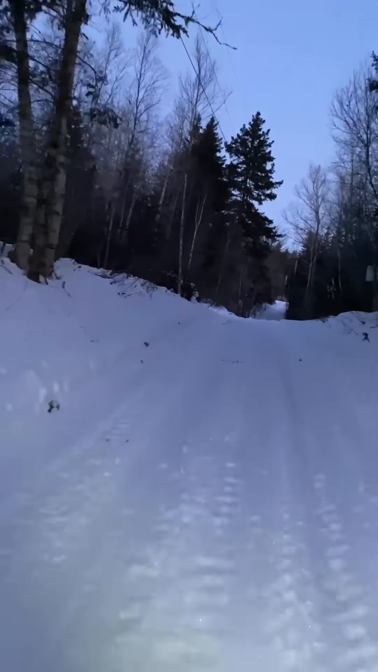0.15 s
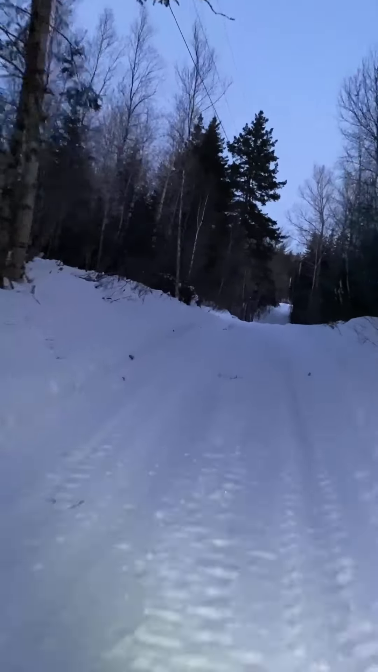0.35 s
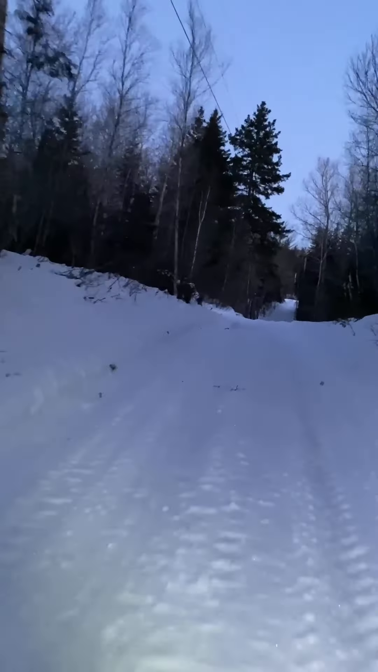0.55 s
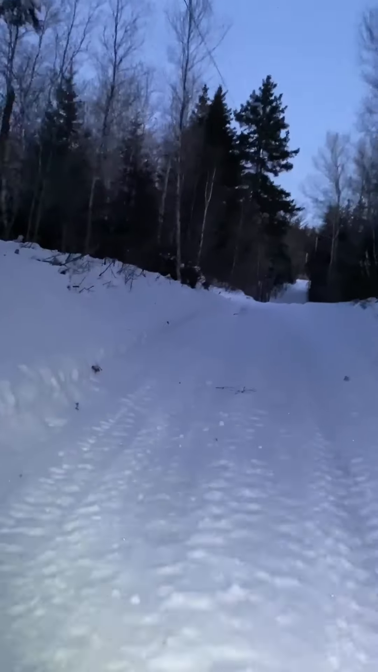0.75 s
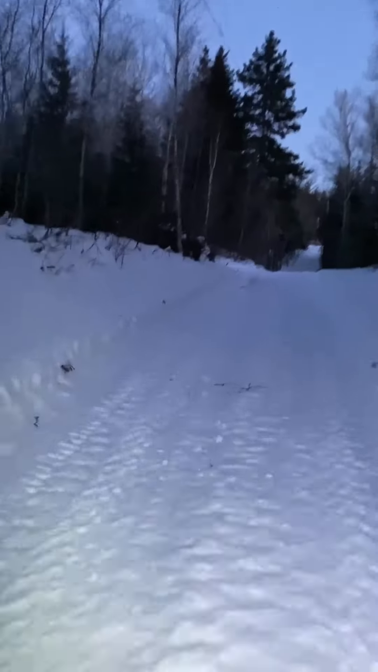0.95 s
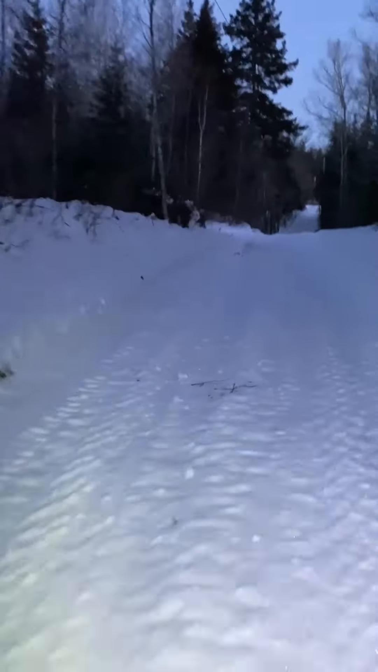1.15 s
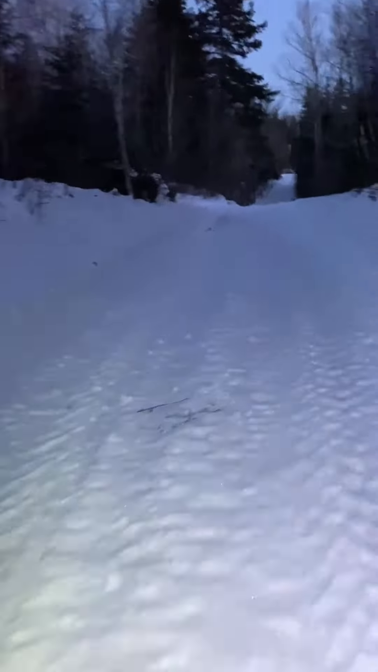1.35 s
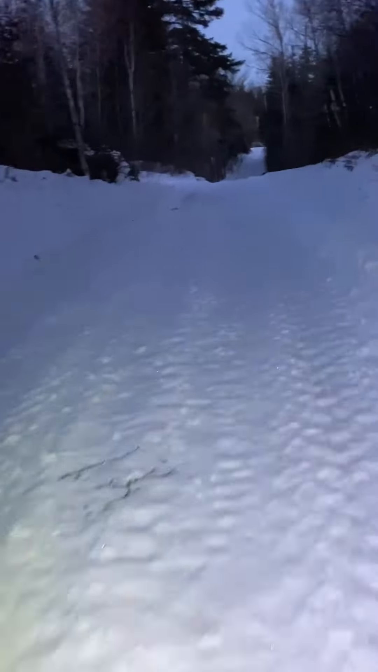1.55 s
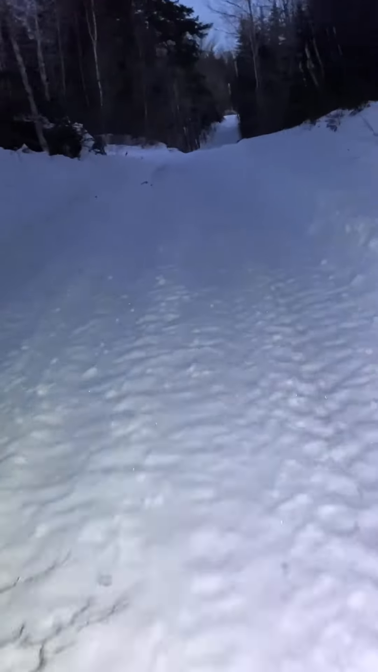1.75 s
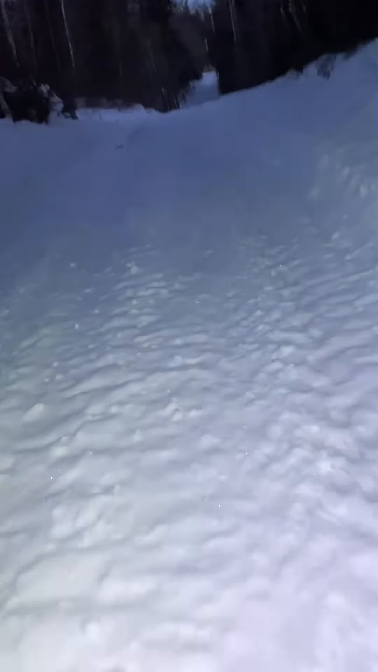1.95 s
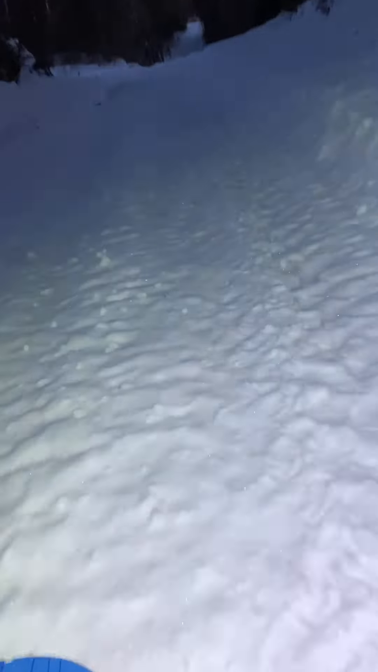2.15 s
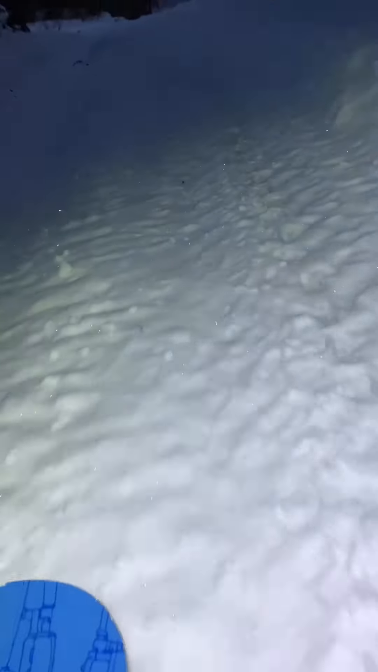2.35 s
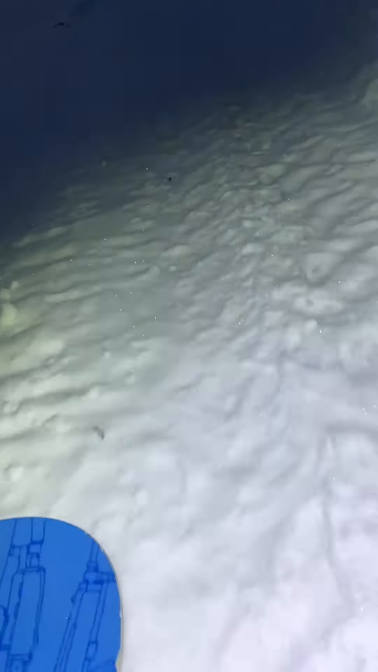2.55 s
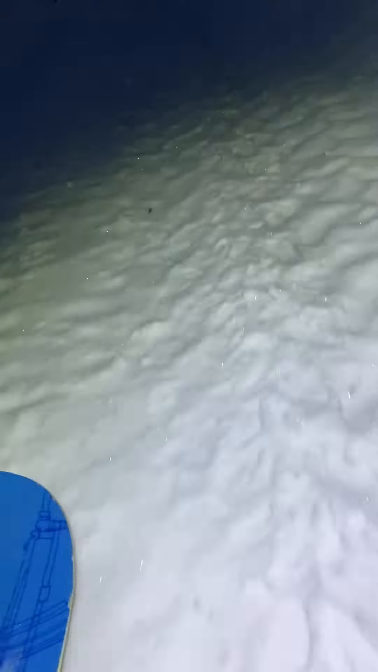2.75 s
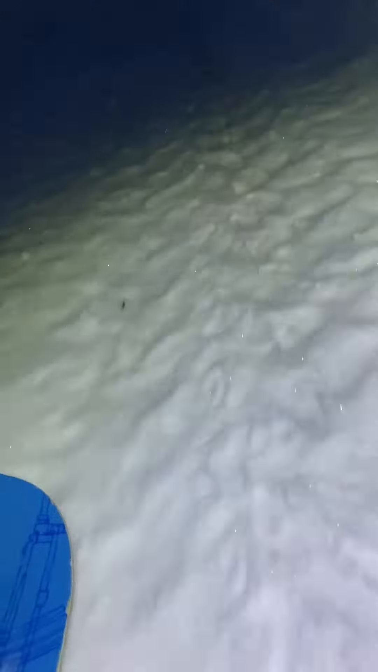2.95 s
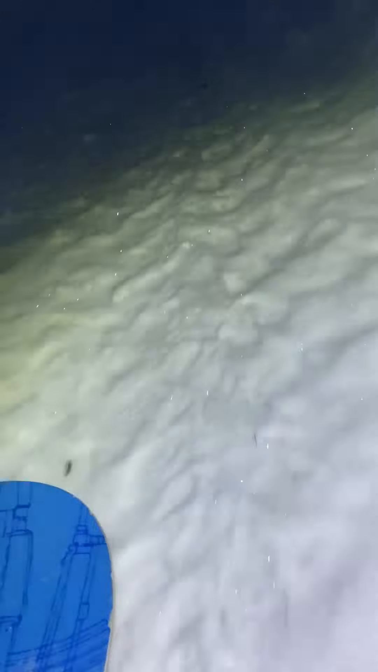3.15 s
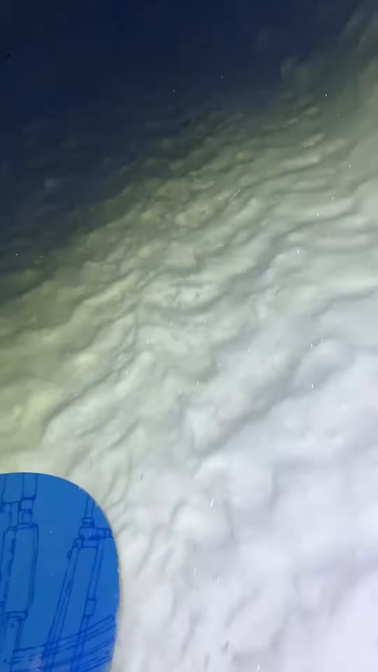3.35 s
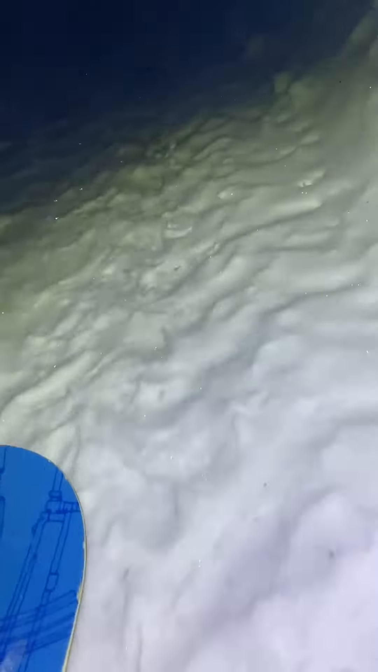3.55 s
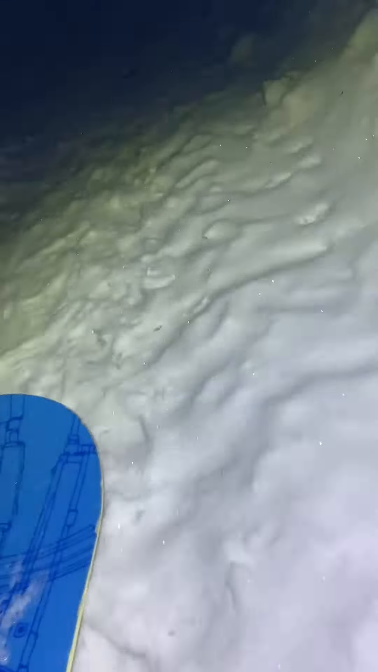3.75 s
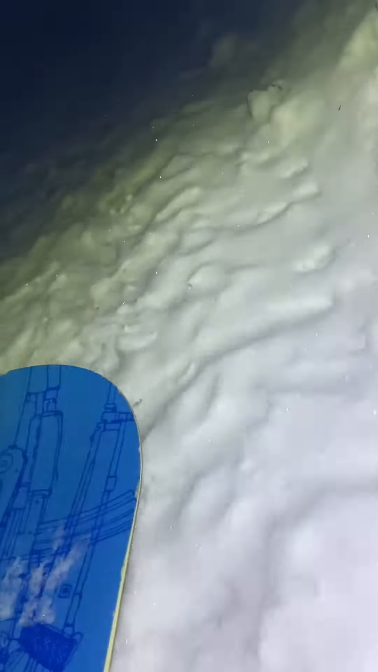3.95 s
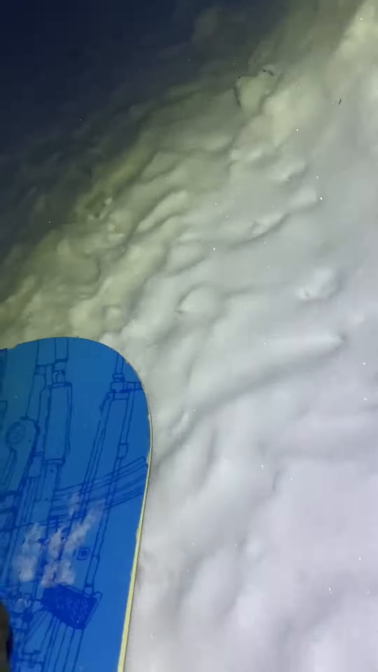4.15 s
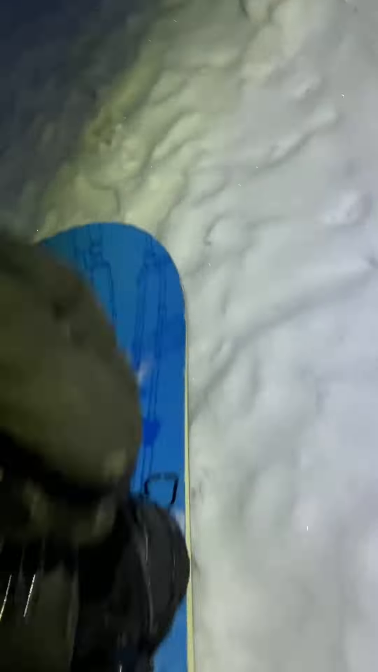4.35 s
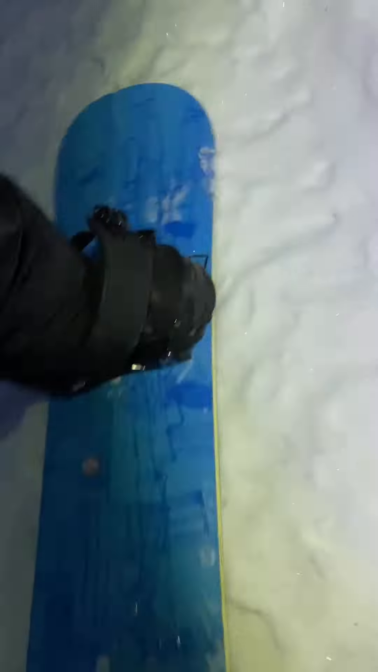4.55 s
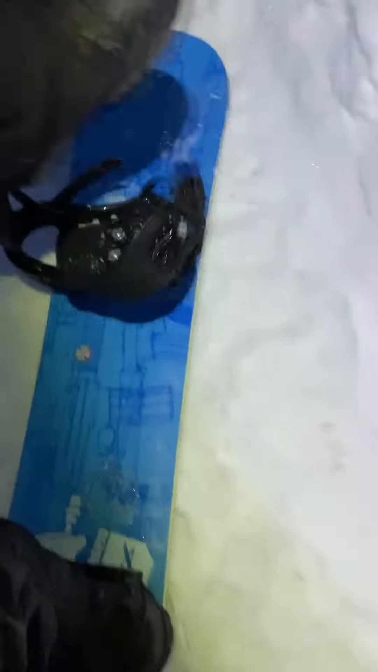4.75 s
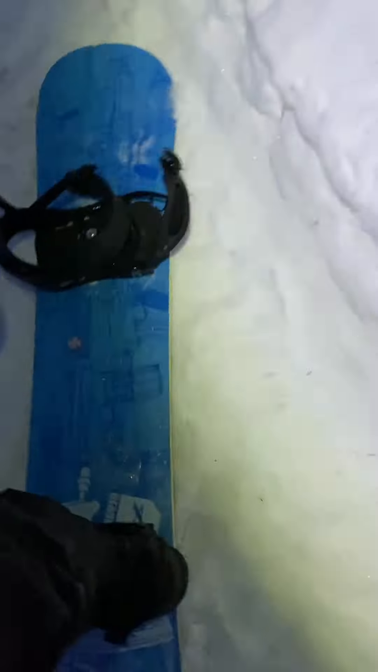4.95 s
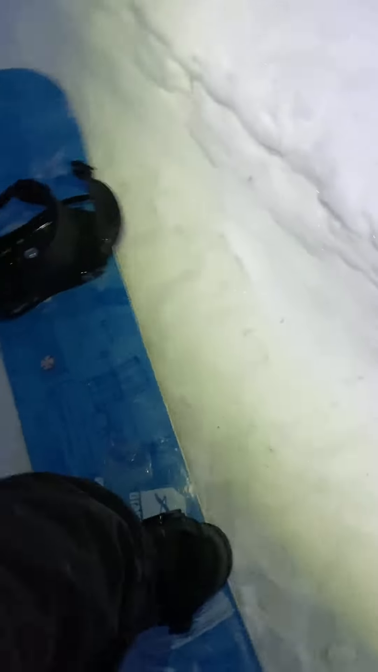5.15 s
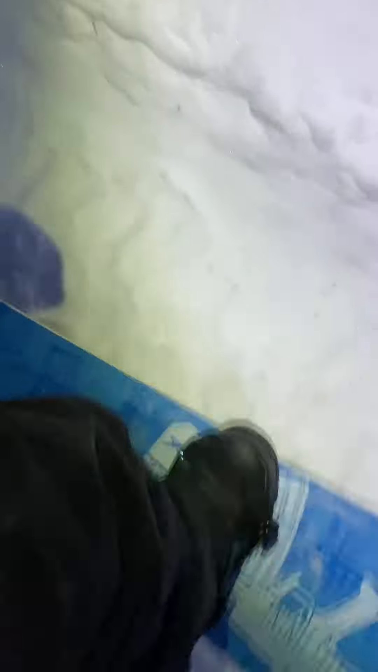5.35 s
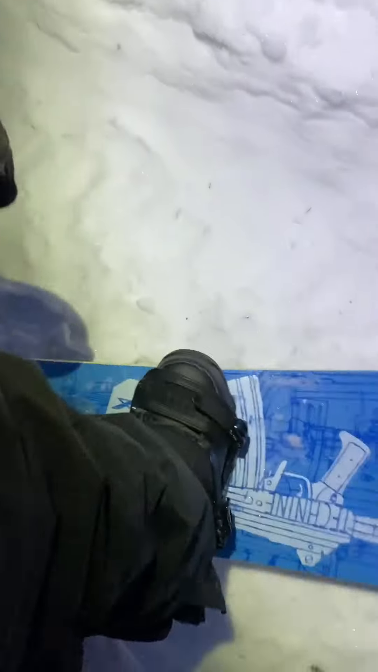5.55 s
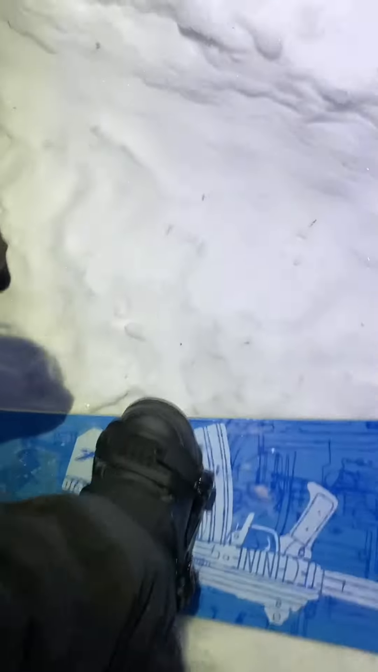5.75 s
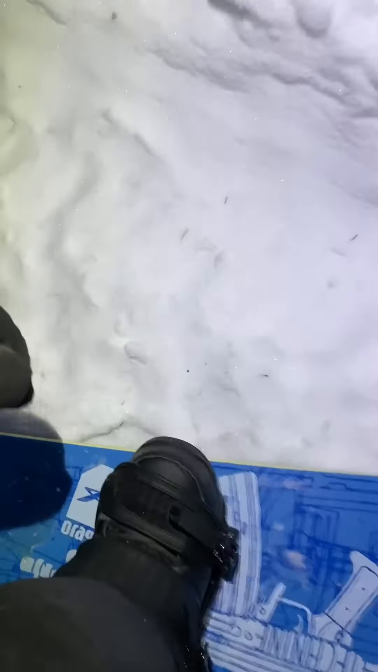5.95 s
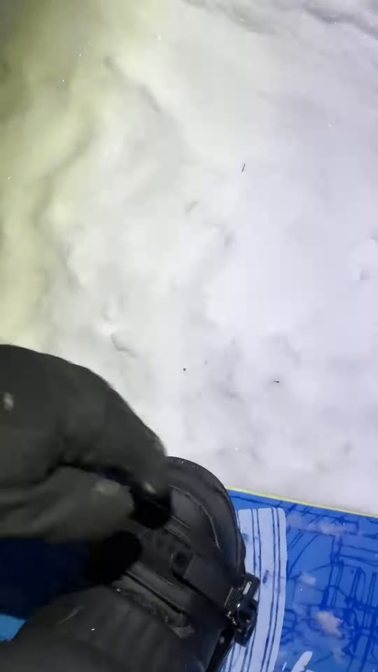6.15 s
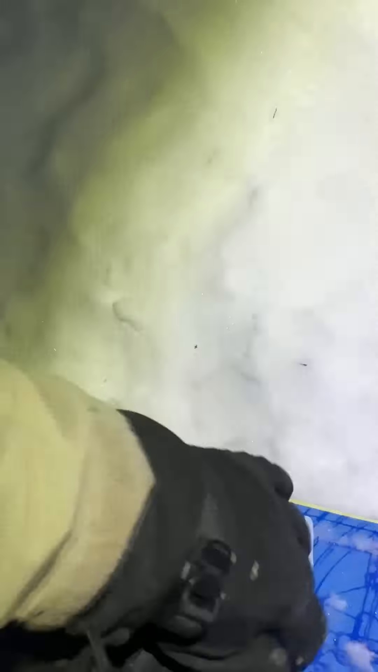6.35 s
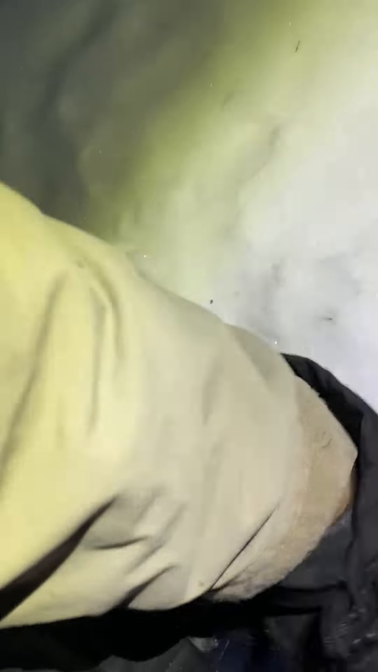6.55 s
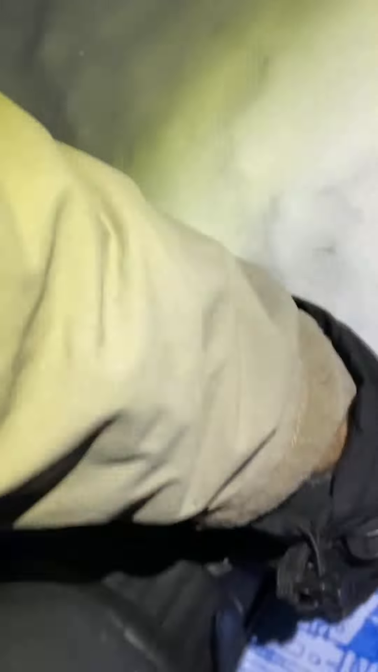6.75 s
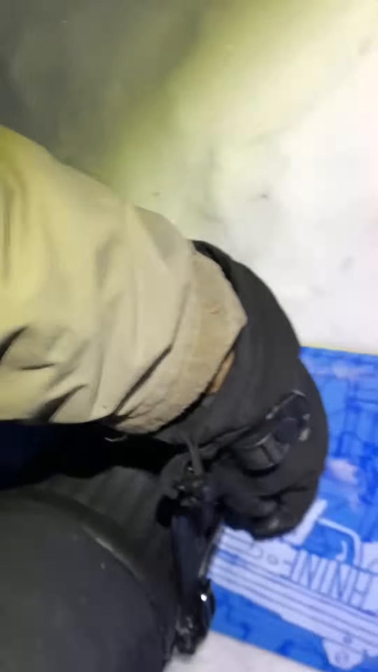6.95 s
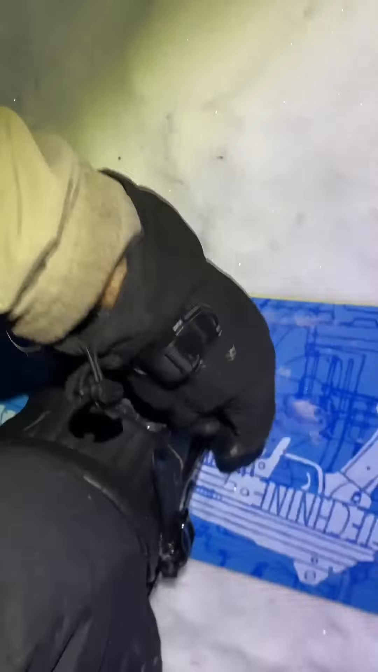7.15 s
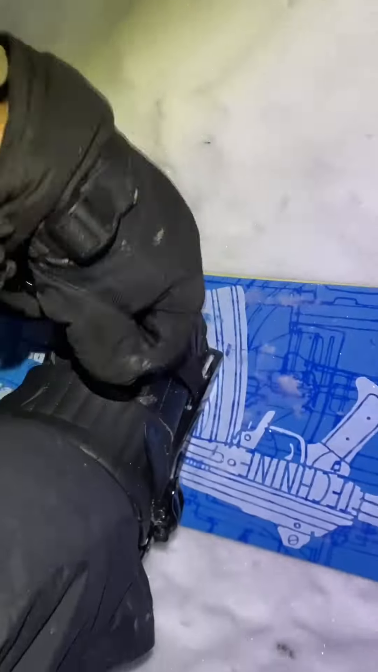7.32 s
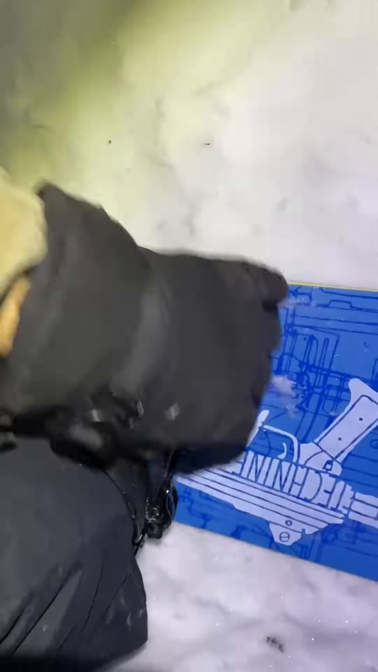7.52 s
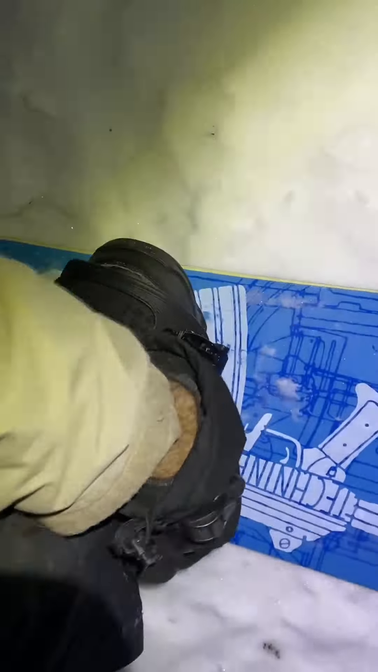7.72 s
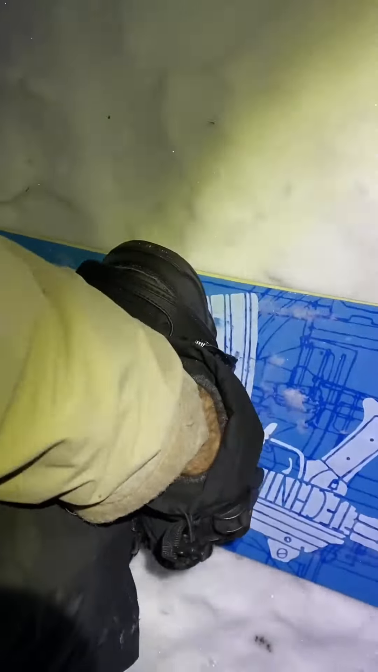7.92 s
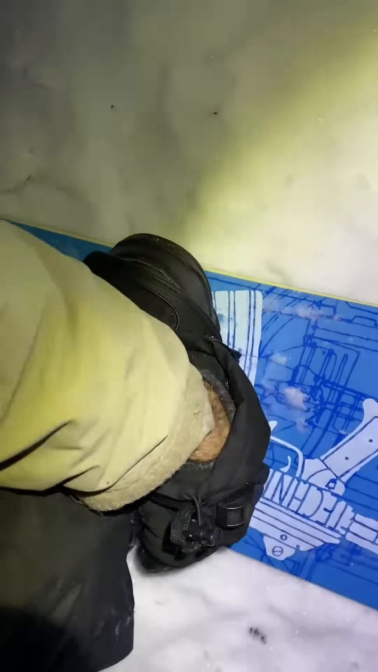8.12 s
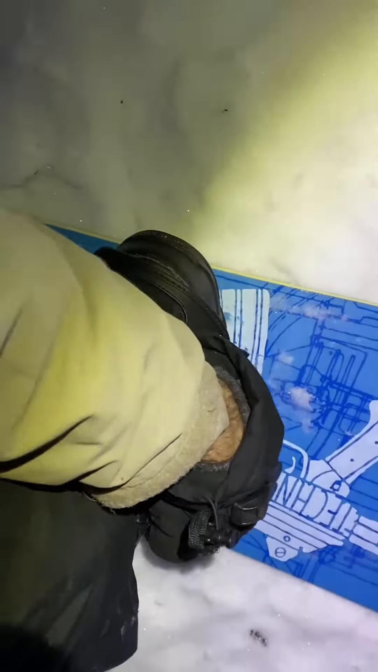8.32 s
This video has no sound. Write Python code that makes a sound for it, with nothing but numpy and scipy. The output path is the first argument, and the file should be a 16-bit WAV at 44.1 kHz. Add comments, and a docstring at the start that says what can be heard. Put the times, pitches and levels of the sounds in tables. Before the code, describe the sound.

Outdoors, dry and close to a handheld stereo phone. From 0 to 1 s a snowboard runs downhill over packed, ribbed snow: a grainy scrape with hollow drumming, soft low wind puffs and a few dull bumps. From 1.1 s icy lumps crack and knock in quick clusters; between 1.9 and 3.5 s braking makes it rougher and brighter, with hissing snow spray strongest around 2.4-2.7 s. Near 3.75-4.25 s a faint hum falls in pitch as the board slows. Short skids and hard knocks follow, notably at 4.65, 5.2 and 5.6 s, ending by about 6.1 s. Then it is quiet: snow creaks, a sleeve rustles, buckles snap at 6.14, 6.55 and 7.0 s, with a fast strap zip at 7.1 s, clicks and a thud around 7.3 s, and a brief glove brush at 7.55 s. Creaks and knocks come at 7.7-7.9 s, then sparse ratchet clicks accelerate into a hard, rapid burst at 8.2 s.

```python
"""On a packed, ribbed snow road, a snowboard runs downhill, heard through the two ports of a phone in the rider's hand.
Filtered noise of tiny fractures makes the base scrape, bumps drum the board's modes and the edge spray snow as it
brakes, skids round and stops; a swept tone is the hum of ribs, and low noise is wind on the ports.
Then slipping grains creak under the boots, a sleeve rustles as coloured noise, fast runs of ticks are a strap and
a glove's fabric, and struck modes with short pings make the buckles and ratchet of a binding."""
import sys
import numpy as np
from scipy import signal
from scipy.fft import rfft, irfft
from scipy.io import wavfile
from scipy.ndimage import uniform_filter1d, map_coordinates

SR = 44100
rng = np.random.default_rng(int(sys.argv[2]) if len(sys.argv) > 2 else 0)


def int16_out(signal):
    """Quantize to a 16-bit WAV file."""
    q = np.round(np.clip(np.atleast_2d(signal).T, -1, 1) * 32767)
    wavfile.write(sys.argv[1], SR, q.astype(np.int16))


N = 373968
TIME = np.arange(N) / SR
STOP_S = 6.1  # the board comes to rest
BEND_S = 0.000922  # lag of bending waves at 1 kHz
FREE_THUD_HZ, PINNED_THUD_HZ = 126, 196  # lowest thud: a board bedded in the snow cannot flex as deeply
GUST_RISE_S, GUST_FADE_S = 0.019, 0.027

# how the board sits, relative to its drumming: ring of the biting edge, deep flex, rumble of the flat base
# time_s, edge_db, flex_db, flat_db
STANCE = [(0, -30, -4, 2), (1.05, -33, -8.5, 2.5), (1.3, -30, -1, -14), (1.9, -6, -2.5, -19),
          (2.7, -9, -4.5, -32), (3.5, 0, -1, -28), (4.0, -3, -11, -33.5), (5.05, -6.5, -1, -29),
          (5.4, -20, -34.5, -26.5), (6.1, -6.5, -28, -29)]
# spectrum of the base scraping on snow: freq_hz, level_db
SCRAPE = [(300, -8), (700, 8.5), (1100, 0), (1450, -1), (1720, 3), (1970, 0.5), (2270, 4), (2800, -1),
          (4100, -4.5), (5100, -3), (6500, -10.5), (9000, -37), (16000, -28.5)]
# spectrum of a bright crack: freq_hz, level_db
CRACK = [(800, -16), (2000, 7), (2600, -12.5), (3400, -5), (5300, 3), (6500, -4.5), (10000, -1),
         (16000, -28)]
# spectrum of rubbing cloth and of the fast ticks: freq_hz, level_db
CLOTH = [(500, -2), (800, 0), (1500, 2), (2400, 0), (2720, -0.5), (3100, -2), (4200, -6), (5300, -3.5),
         (6500, -7.5), (10000, -8), (16000, -14.5)]


def undb(db):
    """Level is logarithmic: decibels to amplitude gain."""
    return 10 ** (np.asarray(db) / 20)


def unit(x):
    """Normalise the mean power: scale to rms 1."""
    return x / np.sqrt(np.mean(x ** 2))


def curves(table):
    """Linear interpolation in time of every column of a table."""
    s, *columns = np.transpose(table)
    return [np.interp(TIME, s, c) for c in columns]


def span(table):
    """Gating: 1 while a table lasts, with short fades outside it."""
    first, last = table[0][0], table[-1][0]
    return np.interp(TIME, [first - .04, first, last, last + .04], [0, 1, 1, 0])


def swell(s, length, rise_s, fade_s, growth_db_per_s=0):
    """Envelope of a push: a linear rise, a hold that may grow or sag, and an exponential decay."""
    age = np.maximum(TIME - s, 0)
    held = undb(growth_db_per_s * np.minimum(age, length))
    decay = np.exp(-np.minimum(np.maximum(age - length, 0) / fade_s, 20))
    return np.minimum(age / rise_s, 1) * held * decay


def walk(rate):
    """Slow modulation: smooth random wandering with a spread near 1."""
    steps = rng.standard_normal(4096)
    return 1.2 * np.interp(TIME * rate, np.arange(len(steps)), steps)


def spectrum_db(points, hz):
    """Interpolation of a spectrum on a logarithmic frequency axis."""
    f, db = np.transpose(points)
    return np.interp(np.log(hz + 1), np.log(f), db)


def colour(x, points, size=4096):
    """Minimum-phase filtering: a causal filter of the given spectrum, built by folding its cepstrum; rms 1."""
    gain = undb(spectrum_db(points, np.fft.rfftfreq(size, 1 / SR)))
    cepstrum = irfft(np.log(gain))
    cepstrum[1:size // 2] *= 2
    cepstrum[size // 2 + 1:] = 0
    response = irfft(np.exp(rfft(cepstrum)))
    return unit(signal.fftconvolve(x, response[None], axes=1)[:, :x.shape[1]])


def band(x, lo_hz, hi_hz, order=3):
    """Band-pass filtering: the part of a sound between two frequencies, with rms 1."""
    return unit(signal.sosfilt(signal.butter(order, [lo_hz, hi_hz], "band", fs=SR, output="sos"), x))


def grains(spread_db, apart, size=N):
    """Fracture noise: dense tiny breaks of unequal size, partly incoherent between the two ports."""
    strength = undb(spread_db * np.minimum(rng.exponential(size=size // 8 + 1), 5))
    noise = rng.standard_normal((3, size)) * np.repeat(strength, 8)[:size]
    return unit(noise[0] + apart * noise[1:])


def crackle(rate, spread_db):
    """Shot noise: lone, sharp fractures of unequal size, each with a fast decay."""
    hits = (rng.random(N) < rate / SR) * undb(spread_db * np.minimum(rng.exponential(size=N), 2.5))
    decaying = signal.lfilter([1], [1, -np.exp(-1 / (0.00059 * SR))], hits)
    return unit(grains(0, 0.38) * decaying)


def jolts(rate, spread_db, fade_s):
    """Stick-slip: crust catches and gives way in random, fading rises of force, with a steady mean power."""
    hits = (rng.random(N) < rate / SR) * undb(spread_db * np.minimum(rng.exponential(size=N), 3))
    force = signal.lfilter([1], [1, -np.exp(-1 / (fade_s * SR))], hits) + 0.48
    return force / np.sqrt(uniform_filter1d(force ** 2, SR // 10))


def patchy(x, depth_db, rate, count=30):
    """Spectral modulation: each patch of snow has its own colour, so neighbouring bands swell and fade apart."""
    hz, s, cells = signal.stft(x, SR, nperseg=512)
    place = count * np.log1p(hz / 500) / np.log1p(hz[-1] / 500)
    chance = rng.standard_normal((1024, count + 2)).T
    grid = np.meshgrid(place, s * rate, indexing="ij")
    wander = map_coordinates(chance, grid, order=1, mode="nearest")
    return unit(signal.istft(cells * undb(depth_db * wander), SR, nperseg=512)[1][:, :N])


def reflect(x, lag_s, share):
    """Comb filtering by a near reflection off the rider's body; its path shifts as the hand moves."""
    late = TIME - lag_s * (1 + 0.272 * walk(3))
    return unit(x + share * np.array([np.interp(late, TIME, port) for port in x]))


def bend(x, lag_s):
    """Dispersion: bending waves bring the highs first and the lows late; the lag is that at 1 kHz."""
    size = x.shape[1]
    lag_phase = 4 * np.pi * lag_s * np.sqrt(np.fft.rfftfreq(size, 1 / SR) * 1000)
    return irfft(rfft(x) * np.exp(-1j * lag_phase), size)


def ring(push, damping):
    """Modal resonance: the board's damped modes answer a push, a little differently at each place."""
    # board with its bindings, before detuning and the damping factor: freq_hz, width_hz, level_db
    modes = [(291, 84, 8), (396.3, 76, 13), (509, 74, 11), (644, 174, 10), (781, 49, 8.5), (1083, 87, 5),
             (1080, 220, -2), (1678, 110, -2.5)]
    size = push.shape[1]
    hz = np.fft.rfftfreq(size, 1 / SR) + 1
    response = 0
    for (f, width, db), (detune, place) in zip(modes, rng.standard_normal((len(modes), 2))):
        f = f * (1 + 0.063 * detune)
        resonance = 1 / (1 + 1j * (hz ** 2 - f ** 2) / (hz * width * damping))
        response = response + undb(db + 0.35 * place) * resonance
    return bend(irfft(rfft(push) * response, size), BEND_S)


def blow(thud_db, crack_db, crunch_s, damping, grit, tail, ping_hz, ping_db, lowest_hz, size=6144):
    """Impact excitation with peak 1: crushed snow rings the board, with a bright crack and short ping on top."""
    t = np.arange(size) / SR
    age = t / max(crunch_s, .0005)
    burst = (1 - np.exp(-2 * age)) * (np.exp(-age) + tail * np.exp(-t / 0.012))
    crunch = unit(grains(0.31, 0.5, size=size) * burst)
    kick = unit(t * np.exp(-t / .0001))
    body = ring(grit * crunch + kick, damping)
    thud = band(body, lowest_hz, 470)
    clack = band(body, 500, 6000)
    crack = colour(grains(2.3, 0.3, size=size) * burst, CRACK)
    # small metal parts ping clearly, large plastic ones give a broad, hollow clack
    width_ratio = np.interp(ping_hz, [1600, 2600], [1.45, 1.06])
    ping = band(crunch, ping_hz / width_ratio, ping_hz * width_ratio, order=2)
    sound = clack + undb(thud_db) * thud + undb(crack_db) * (crack + undb(ping_db) * ping)
    return sound / np.abs(sound.mean(axis=0)).max()


def snap(db, thud_db, crack_db, ping_hz):
    """Short, hard impact of buckle or pawl, carried into the board."""
    sound = blow(thud_db - .3, crack_db - 10.0, crunch_s=0.0018, damping=0.66, grit=1.35, tail=0.015,
                 ping_hz=ping_hz, ping_db=4.5, lowest_hz=PINNED_THUD_HZ)
    return undb(db - 5.0) * sound


def add(out, s, sound):
    """Superposition: mix a sound in at a time."""
    start = int(s * SR)
    part = sound[:, :N - start]
    out[:, start:start + part.shape[1]] += part


def air():
    """Turbulence: eddies buffet the ports as low noise over the faint, steady hush of the forest."""
    # airflow on the ports: time_s, level_db
    wind_db, = curves([(0, -35.5), (1.2, -44.5), (2.6, -51), (4.2, -56), (4.8, -35.5), (5.4, -55.5),
                       (8.48, -65)])
    # single eddies and movements of the hand: start_s, length_s, level_db
    gust_list = [(0.03, 0.3, -37.5), (.33, 0.05, -36), (0.565, 0.051, -35), (0.824, 0.057, -31.5),
                 (1.478, 0.051, -37), (4.95, 0.14, -43), (5.565, 0.027, -30.5)]
    # spectrum of wind on the ports: freq_hz, level_db
    buffet = [(15, -37), (30, -10), (48, -4.5), (62, 2.5), (90, -4.5), (150, 0.5), (300, -13), (1000, -44)]
    # spectrum of the forest hush: freq_hz, level_db
    forest = [(25, -13), (60, 4), (200, -6), (650, -22), (1200, -3.5), (2500, -11), (5000, -25),
              (16000, -14)]
    gusts = sum(undb(db) * swell(s, length, GUST_RISE_S, GUST_FADE_S) for s, length, db in gust_list)
    wind = colour(grains(0, 0.44), buffet) * np.hypot(undb(wind_db), gusts) * undb(1.3 * walk(15))
    return wind + colour(grains(0, 0.5), forest) * undb(-62.5)


def grip():
    """Structure-borne sound: brief, wavering hums through the phone's body as the grip shifts."""
    # soft low hums, pitch before its waver: start_s, length_s, pitch_hz, level_db
    hum_list = [(6.486, .07, 66, -42.5), (6.855, 0.083, 93.7, -50)]
    out = np.zeros(N)
    for s, length, hz, db in hum_list:
        phase = 2 * np.pi * np.cumsum(hz * (1 + .04 * walk(30))) / SR
        out += unit(np.sin(phase)) * undb(db) * swell(s, length, GUST_RISE_S, GUST_FADE_S)
    return out


def rider():
    """Stick-slip friction: packed snow creaks in small slips under the boots while jacket and glove rub."""
    # the rider shifts weight and reaches down: start_s, length_s, rise_s, creak_db, cloth_db
    move_list = [(6.056, 0.43, 0.27, -33, -43.5), (6.354, 0.085, 0.018, -29, -40),
                 (6.769, 0.28, 0.28, -40, -47), (7.088, 0.1, 0.03, -45.5, -43.5),
                 (7.535, 0.18, 0.032, -49, -39.5), (7.699, 0.26, 0.011, -30.5, -42),
                 (8.267, 0.18, .03, -57, -55)]
    # spectrum of creaking snow: freq_hz, level_db
    creak_spectrum = [(59, -47), (100, -21), (118, -26), (144, -22), (215, -9), (313, 5), (543, 4),
                      (791, 2.5), (1020, -8), (2000, -22), (2600, -41), (4400, -120)]
    still_creak_db, still_cloth_db = -59, -60.5  # crouching is never quite still
    power = np.outer(undb([still_creak_db, still_cloth_db]), TIME > STOP_S) ** 2
    for s, length, rise_s, *db in move_list:
        power += np.outer(undb(db), swell(s, length, rise_s, fade_s=0.032)) ** 2
    creak_gain, cloth_gain = np.sqrt(power)
    slips = jolts(rate=140, spread_db=-7.0, fade_s=0.0052)
    creak = patchy(colour(grains(1.4, 0.39) * slips, creak_spectrum), depth_db=6.0, rate=33)
    rub = grains(2.5, 0.13) * slips ** 0.5 + undb(-3.5) * crackle(rate=90, spread_db=3.0)
    cloth = reflect(colour(rub, CLOTH), lag_s=0.001664, share=0.22)
    return creak * creak_gain + cloth * cloth_gain


def tick_runs():
    """Repeated short excitation: slightly uneven runs of decaying ticks, each run swelling and easing."""
    # fast runs of small ticks: a strap through its buckle, then a glove's fabric brushing, thin and high;
    # mean tick rate: start_s, end_s, ticks_hz, level_db, ping_hz
    run_list = [(7.087, 7.2, 102.8, -39.5, 2210), (7.532, 7.606, 125.7, -38.5, 9150)]
    out = np.zeros((2, N))
    for start, end, ticks_hz, db, ping_hz in run_list:
        since_tick = np.cumsum(1 + 0.15 * walk(60)) * ticks_hz / SR % 1  # fraction of a cycle
        ticks = grains(1, 0.26) * np.exp(-since_tick / 0.11)
        stroke = np.sin(np.pi * np.clip((TIME - start) / (end - start), 0, 1))
        ping = band(ticks, ping_hz * .9, ping_hz * 1.1, order=1)
        out += unit(colour(ticks, CLOTH) + ping) * undb(db) * stroke
    return out


def binding():
    """Impact and friction: buckles snap, a pawl drops into tooth after tooth, and the tightening strap rasps."""
    # single snaps of the buckles, levels before the trims in snap(): start_s, peak_db, thud_db, crack_db, ping_hz
    click_list = [(5.1852, -13.5, 6, 1, 5400), (6.137, -11, 1, 7, 5700), (6.5484, -11, -0.5, 6, 1020),
                  (6.664, -33, -12, 0, 1050), (7.0126, -8.5, 1.5, 8.5, 1570), (7.301, -17, 8, 10, 5000),
                  (7.32, -16, -2, 1, 1570), (7.3275, -16.5, 2, 8, 5230), (7.3986, -30.5, -15, 3, 1620),
                  (7.491, -23, -6, 20, 2620)]
    # ratchet teeth, slack, then quick and hard under load; same trims: start_s, peak_db, crack_db
    tooth_list = [(8.006, -26.5, -12), (8.036, -28.5, -14), (8.071, -31, -23), (8.115, -31, -23),
                  (8.159, -30, -3), (8.1832, -15.5, -14), (8.202, -6.5, -26), (8.212, -12, -19),
                  (8.223, -16, -5), (8.233, -13.5, -11), (8.2437, -15, -3), (8.2572, -19, -7),
                  (8.2686, -16, -5), (8.2802, -20, -19)]
    out = np.zeros((2, N))
    for s, db, thud_db, crack_db, ping_hz in click_list:
        add(out, s, snap(db, thud_db, crack_db, ping_hz))
    for s, db, crack_db in tooth_list:
        add(out, s, snap(db, thud_db=-2, crack_db=crack_db, ping_hz=1130))
    # the strap rasps and creaks as the ratchet pulls it tight
    rub = grains(2.8, .35)
    rasp = undb(-41) * colour(rub, SCRAPE)
    creak = undb(-30) * band(rub, 370, 1430, order=2)
    crank = swell(8.203, length=0.068, rise_s=0.0037, fade_s=0.0078, growth_db_per_s=-87)
    return out + (rasp + creak) * crank


def lumps(size=4096):
    """Brittle fracture: icy crust breaks and crumbles, and the loaded board answers with a short, dead knock."""
    # icy lumps under the base and steel edge: start_s, peak_db, crumble_s, crack_db
    lump_list = [(.236, -18.5, .003, 6), (.423, -14.5, 0.0057, 0), (.59, -15, .014, -3),
                 (1.137, -14, 0.0092, 18), (1.177, -13, 0.01, 0), (1.226, -8.5, .011, 6),
                 (1.252, -10.5, 0.0063, -5), (1.307, -12, .003, 6), (1.34, -7, 0.0033, 3),
                 (1.359, -16, 0.0052, 10), (1.398, -19, 0.0065, 8), (1.753, -8.5, 0.0056, 1),
                 (1.8988, -10, 0.0042, 9), (1.955, -8.5, 0.023, 5), (2.082, -13, .005, 1),
                 (2.1312, -6.5, .002, -11), (2.147, -9.5, 0.013, -3), (2.165, -6.5, 0.0062, 3),
                 (2.1812, -10.5, 0.0027, -10), (2.403, -10, 0.0043, 7), (2.568, -6, .004, -4),
                 (2.599, -11, .008, 0), (2.634, -6.5, .003, -7), (2.662, -7, 0.0062, -1),
                 (2.748, -11, 0.0044, -8), (2.87, -9.5, 0.0079, 4), (2.958, -15, 0.004, 17),
                 (3.123, -10.5, 0.0054, -5), (3.35, -5, 0.0036, -10), (3.3826, -6.5, .004, -8),
                 (4.129, -13.5, .003, -4), (4.2255, -7, .003, 22), (4.228, -7, 0.0036, -5),
                 (4.245, -7.5, 0.0029, -9), (5.258, -13.5, 0.0053, -1), (5.345, -12, 0.0086, 7),
                 (5.374, -19, 0.0016, 9)]
    out, t = np.zeros((2, N)), np.arange(size) / SR
    edge_db = curves(STANCE)[0]
    for s, db, crumble_s, crack_db in lump_list:
        ring_hz = 944 + 8.5 * edge_db[int(s * SR)]  # the knock rises as the edge bites
        crunch = grains(2.14, 0.32, size=size) * (1 - np.exp(-t / 0.00042)) * np.exp(-t / crumble_s)
        knock = band(crunch, ring_hz * 0.577, ring_hz * 1.26) + undb(-2.5) * band(crunch, 191, 600, order=2)
        crack = colour(crunch, SCRAPE) + undb(-13.0) * colour(crunch, CRACK)
        sound = bend(knock + undb(crack_db) * crack, BEND_S)
        add(out, s, undb(db) * sound / np.abs(sound.mean(axis=0)).max())
    return out


def knocks():
    """Impact on a damped plate: heavy blows crush snow under the board and shake the bindings."""
    # blows from bumps, boots and bindings, levels before the trims below:
    # start_s, peak_db, thud_db, crack_db, crunch_s
    knock_list = [(0.313, -11, 13, -17, 0.0016), (.722, -12, 10, -23, 0.0011),
                  (0.7505, -8, 3.5, -17, 0.00089), (0.8469, -10, 7, -8, .005),
                  (0.9052, -4.5, 3.5, -17, 0.003), (1.6204, -10, 5, -1.5, 0.0028),
                  (1.746, -9.5, -11, -3, 0.0052), (1.993, -9, -1, -20, 0.0093),
                  (2.299, -10.5, 4, -10, 0.0067), (2.684, -6, 1, -2, 0.0047), (2.9216, -4, 2, 0, 0.0052),
                  (3.42, -7.5, 1.5, -7, 0.0065), (3.447, -15.5, -5, -9, 0.01),
                  (4.3883, -7.5, 3, -22, 0.0037), (4.647, -1, -7, -2.5, 0.0041),
                  (4.651, -4.5, 2, -19, 0.0049), (4.7135, -12, 10, -3, 0.002),
                  (4.7902, -14, 1.5, -21, 0.0066), (5.0437, -14, 6, -28, 0.0024),
                  (5.2165, -5.5, 1, -6.5, 0.0041), (5.3253, -7, -14, -3, 0.0024),
                  (5.579, -4.5, 8, -10, 0.0092), (5.584, -2, -2, -18, 0.0036),
                  (5.641, -2, -0.5, -13, 0.0024), (5.7127, -10, -7.5, -8.5, 0.0025),
                  (5.754, -18.5, -7, -8, 0.0015), (5.807, -21, 0, -7, 0.0024),
                  (5.8563, -12.5, -6, -6, 0.0037), (5.878, -6.5, -8, -12, 0.002),
                  (5.918, -10, -3, -23, 0.00094), (6.476, -12.5, 1.5, -7, 0.0047),
                  (7.2678, -6.5, 6, -11, 0.0035), (7.7037, -11, 3.5, -18, 0.0039),
                  (7.7228, -14, 4, -27, 0.0038), (7.7722, -13.5, -0.5, -32, 0.0022),
                  (7.808, -23.5, -3, -24, 0.0036), (7.829, -23, -8, -18, .003),
                  (7.9397, -10.5, 2.5, -12, 0.004)]
    out = np.zeros((2, N))
    for s, db, thud_db, crack_db, crunch_s in knock_list:
        lowest_hz = FREE_THUD_HZ if s < STOP_S else PINNED_THUD_HZ
        sound = blow(thud_db - .3, crack_db - 4.0, crunch_s, damping=0.76, grit=2.92, tail=0.089,
                     ping_hz=rng.uniform(2200, 5600), ping_db=-2.5, lowest_hz=lowest_hz)
        add(out, s, undb(db + 0.5) * sound)
    return out


def ribs():
    """Periodic excitation: evenly spaced ribs make the slowing board hum at their passing rate."""
    # ribs passing under the board, before the small wander of pitch and level: time_s, ribs_hz, level_db
    rib_table = [(3.74, 165, -54), (3.89, 131, -41), (3.95, 123, -38), (4.08, 99, -42), (4.28, 79, -55)]
    hz, db = curves(rib_table)
    phase = 2 * np.pi * np.cumsum(hz * (1 + 0.0085 * walk(34))) / SR
    return unit(np.sin(phase)) * undb(db + 1.4 * walk(14)) * span(rib_table)


def contact():
    """Incoherent addition: glide, last slow drag and skids add in power to drive drumming, scrape and spray."""
    # the steady run downhill, before the trims below: time_s, drum_db, scrape_db, spray_db
    glide = [(0.0, -28, -26.5, -46), (0.09, -28.5, -32.5, -48), (0.46, -23.5, -27.5, -44.5),
             (0.79, -22.5, -30, -47), (1.32, -27, -26, -42), (1.45, -30, -34, -44.5),
             (1.76, -26.5, -24.5, -42.5), (1.86, -31.5, -34, -44), (1.97, -23, -27, -40.5),
             (2.26, -23.5, -25.5, -38), (2.67, -31.5, -33, -34), (3.04, -25.5, -30, -40.5),
             (3.5, -24, -27, -34.5), (3.62, -29.5, -30, -35), (3.95, -28, -31, -41),
             (4.02, -20.5, -24.5, -34), (4.14, -26.5, -29.5, -35.5), (4.17, -36, -35, -78)]
    # between skids the base still drags: time_s, scrape_db
    drag = [(4.17, -35.5), (4.98, -48.5), (5.5, -49.5), (6.1, -41)]
    # the edge digs in to brake, then to swing the board round; levels at the onset, before growth:
    # start_s, length_s, drum_db, scrape_db, spray_db
    skid_list = [(1.11, 0.29, -34, -31, -48), (1.522, 0.058, -35.5, -25, -42),
                 (1.94, 0.22, -31.5, -25.5, -36), (2.269, 0.08, -22, -27, -40),
                 (2.386, 0.12, -29, -23.5, -29.5), (2.474, 0.33, -22, -25.5, -32),
                 (2.58, 0.12, -37, -26, -22.5), (2.855, 0.16, -44, -26, -31.5),
                 (3.186, 0.079, -42, -28, -33.5), (3.519, 0.034, -25.5, -36, -45),
                 (4.315, 0.19, -28, -29.5, -34), (4.494, 0.065, -24.5, -27.5, -26),
                 (4.604, 0.064, -27, -35.5, -39), (4.766, 0.051, -26.5, -32, -36.5),
                 (5.054, 0.09, -25.5, -34.5, -46.5), (5.23, 0.12, -20, -28, -37.5),
                 (5.337, 0.032, -17, -22, -35), (5.417, 0.08, -21.5, -30.5, -39),
                 (5.551, 0.1, -15.5, -27, -35.5), (5.865, 0.11, -27, -33.5, -43.5)]
    glide_db = np.array(curves(glide)) + np.array([[-2], [0.5], [4]])
    power = (undb(glide_db) * span(glide)) ** 2
    drag_db, = curves(drag)
    power += (undb([drag_db + 3, drag_db, drag_db - 9]) * span(drag)) ** 2
    for s, length, *db in skid_list:
        push = swell(s, length, rise_s=0.017, fade_s=0.031, growth_db_per_s=9)
        power += np.outer(undb(db), push) ** 2
    return np.sqrt(power)


def ride():
    """Random excitation of a plate: jolts of crust drum the board, roughen the scrape and throw off spray."""
    # spectrum of the drumming board: freq_hz, level_db
    drum_spectrum = [(70, -54.5), (130, -7.5), (195, -15), (275, -1), (390, -1), (510, -3.5), (730, -3.5),
                     (920, -27.5), (1400, -21), (2500, -65.5)]
    # spectrum of the thrown snow: freq_hz, level_db
    spray_spectrum = [(2500, -7.5), (5000, 0), (7000, -5.5), (8800, 3.5), (10000, 0.5), (11500, -5),
                      (13500, -5), (16000, -6)]
    # swinging across the slope stiffens the board, deepest part of the drumming: time_s, level_db
    swing = [(5.05, -0.5), (5.25, -8.5)]
    drum_gain, scrape_gain, spray_gain = contact()
    edge_db, flex_db, flat_db = curves(STANCE)
    force = jolts(rate=130, spread_db=5.0, fade_s=0.0039)
    crumbs = jolts(rate=170, spread_db=4.5, fade_s=0.0018)

    push = grains(0.81, 0.24) * force ** 0.69
    # on its edge the board rings higher; at speed its whole length flexes; lying flat it rumbles
    edge = band(grains(0.9, 0.16) * force, 723, 1216, order=2) * undb(edge_db)
    flex = band(grains(0.79, 0.22) * force, 173.7, 284) * undb(flex_db)
    flat = band(grains(0.86, 1.0) * force ** .4, 234, 403) * undb(flat_db)
    drum = patchy(colour(push, drum_spectrum) + edge + flex + flat, depth_db=4.0, rate=45)
    deep = signal.sosfiltfilt(signal.butter(4, 390, fs=SR, output="sos"), drum)
    drum = drum - deep + deep * undb(curves(swing)[0])

    crust = grains(1.47, 0.79) * force ** 0.26 * crumbs ** 0.25
    crust = crust + undb(-3.0) * crackle(rate=240, spread_db=2.5)
    scrape = patchy(bend(colour(crust, SCRAPE), BEND_S), depth_db=3.5, rate=70)
    scrape = reflect(scrape, lag_s=.0022, share=0.25)

    crystals = grains(1.6, .45) * force ** 0.27 * crumbs ** .5
    spray = patchy(colour(crystals, spray_spectrum), depth_db=3.5, rate=46)

    load = walk(21.9)  # the uneven road loads and unloads the board
    drum = drum * drum_gain * undb(0.94 * load)
    scrape = scrape * scrape_gain * undb(0.5 * load - 1.8)
    spray = spray * spray_gain * undb(0.23 * load + 0.84)
    return drum + scrape + spray


def scene(right_db=0.5):
    """Superposition at the phone, with the rider's hand and binding a little to the right by level difference."""
    close = (binding() + rider() + tick_runs()) * undb(np.array([[-right_db], [right_db]]) / 2)
    return air() + grip() + close + lumps() + knocks() + ribs() + ride()


def record(dry):
    """Linear filtering and soft limiting: ports differ in phase and level; bass and top are cut, peaks rounded."""
    # phase by which the left port leads: freq_hz, lead_rad
    port_phase = [(0, 0), (1290, .3), (1720, -.2), (2930, 1.3), (5170, .4), (6400, 1.7), (7300, 3.14),
                  (8200, 3.9), (10000, 6.1), (11500, 7.1), (12700, 8.7), (13600, 9.42), (14500, 10.2),
                  (16000, 12)]
    # left port minus right port: freq_hz, level_db
    port_balance = [(100, -0.5), (250, 0), (500, -2.5), (800, -3.5), (1300, -0.5), (1800, 0), (4000, -.5),
                    (8000, 0)]
    hz = np.fft.rfftfreq(N, 1 / SR)
    sides = np.array([[.5], [-.5]])  # each port takes half of the difference
    lead = np.interp(hz, *np.transpose(port_phase))
    ports = undb(sides * spectrum_db(port_balance, hz)) * np.exp(1j * sides * lead)
    heard = irfft(rfft(dry) * ports, N)
    heard = signal.sosfilt(signal.butter(3, 38, "high", fs=SR, output="sos"), heard)
    rounded = heard / (1 + (heard / .92) ** 6) ** (1 / 6)
    return signal.sosfilt(signal.ellip(10, .2, 80, 15900, fs=SR, output="sos"), rounded)


dry = scene()
out = record(dry)
int16_out(out)
```